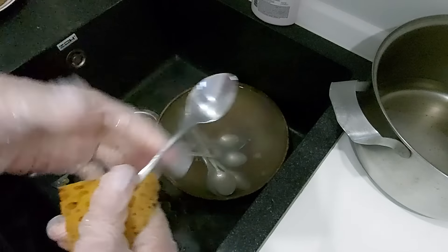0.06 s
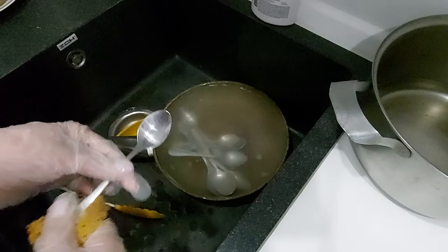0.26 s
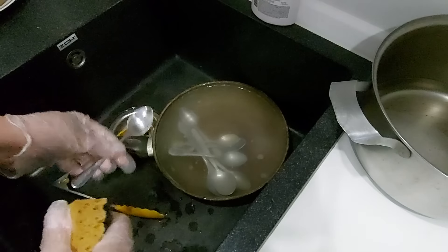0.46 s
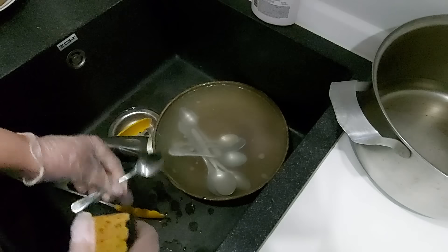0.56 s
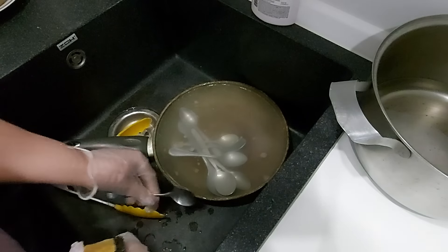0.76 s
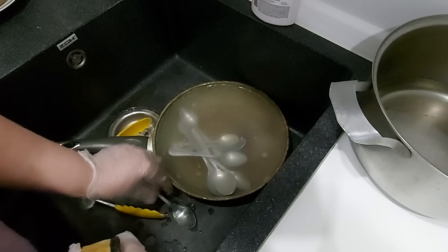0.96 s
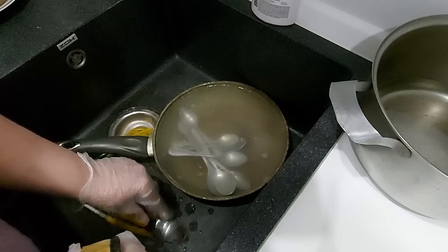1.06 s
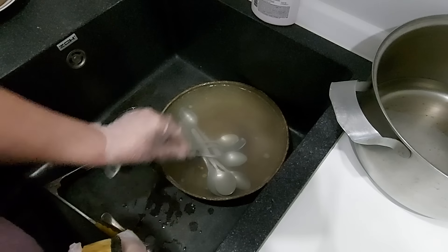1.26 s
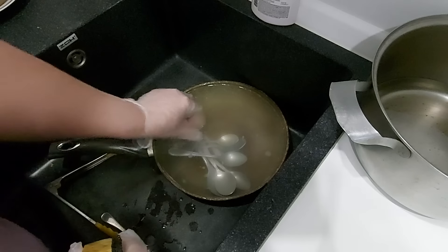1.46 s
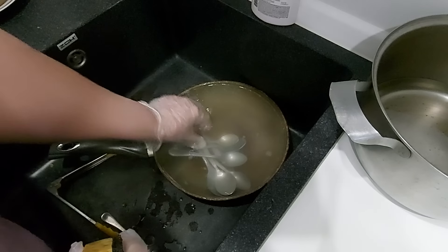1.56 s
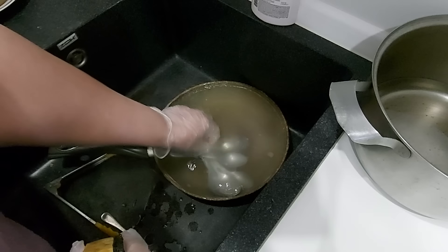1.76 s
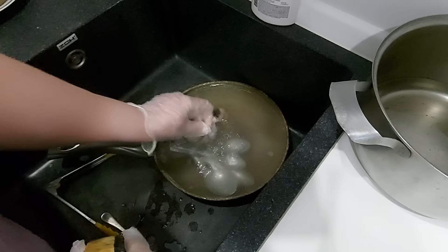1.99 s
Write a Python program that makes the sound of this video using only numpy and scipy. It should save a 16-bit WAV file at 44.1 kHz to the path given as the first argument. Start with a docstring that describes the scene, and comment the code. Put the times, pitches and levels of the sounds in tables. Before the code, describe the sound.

Quick metallic clatter of a dropped spoon on a pan, followed by splashing, bubbling dishwater

```python
"""At a kitchen sink, someone washes up. A wet sponge slides off a spoon, heard as flickering noise.
The spoon taps the basin, slides a little way over it and is let go. It clatters against a metal pan
in one quick run of bounces, made of noise bursts and dying tones, and rings briefly.
Then a gloved hand dips into the water in the pan and stirs it: noise for wash and spray,
short tones with rising pitch for bubbles and plops. A faint room noise and a low hum lie beneath."""
import sys
import numpy as np
from scipy import signal
from scipy.io import wavfile

SR = 44100
rng = np.random.default_rng(int(sys.argv[2]) if len(sys.argv) > 2 else 0)


def pcm_store(signal):
    """Save signal as 16-bit PCM."""
    levels = np.round(np.clip(np.atleast_2d(signal), -1, 1) * 32767)
    wavfile.write(sys.argv[1], SR, levels.astype(np.int16).T)


N = 89522
T = np.arange(N) / SR   # time of every sample, s

# All levels are relative where a gain setting or a scaling to rms 1 follows.
# How alike left and right sound: pitch_hz, correlation
LIKENESS = [(50, 1), (400, 0.82), (600, 0.3), (1200, -0.041), (2500, -0.0057), (8000, -0.011), (15000, .1)]
# Left-right balance: pitch_hz, left_minus_right_db
BALANCE = [(100, .5), (550, 4), (1200, 1.5), (2500, 3), (5000, -1), (9000, 1.5), (15000, -2.5)]

# Noise of the quiet kitchen: pitch_hz, level_db_per_hz
KITCHEN_COLOUR = [(25, -6), (60, 2), (130, -1.5), (200, 0.5), (295, 2), (450, -4), (1000, -14),
                  (1400, -20.5), (1900, -17), (2700, -22.5), (3500, -22), (7000, -32), (11900, -17),
                  (16000, -28)]
KITCHEN_DB, HUM_HZ, HUM_DB = -72, 61.3, -80

# The sponge sliding, then the glove shifting: time_s, level_db
RUB_LEVEL = [(0, -72), (.058, -72), (.128, -59.5), (.23, -57.5), (.27, -67.5), (.39, -62.5), (.48, -74),
             (.734, -73), (.778, -64.5), (.88, -63.5), (.94, -69), (.995, -58.5)]
# Tone colour of the rubbing: pitch_hz, level_db_per_hz
RUB_COLOUR = [(600, -25), (1000, -11), (1700, -13), (2600, -8.5), (4020, 0), (6400, -6), (12100, -1.5),
              (16000, -12.5)]
RUB_DB, RUB_FLICKER_DB = 3.5, 1.6
# Soft handling noise low in the basin: time_s, level_db
HANDLING_LEVEL = [(0, -52), (.08, -64), (.2, -70), (.35, -110), (.74, -75.5), (.8, -68), (.96, -68.5),
                  (.99, -58), (1.02, -82)]
# Tone colour of the handling: pitch_hz, level_db_per_hz
HANDLING_COLOUR = [(35, -22.5), (60, -16.5), (200, -13), (290, -5.5), (400, -16), (890, -17), (1770, -22.5),
                   (2570, -35), (4000, -24), (6500, -44.5)]
# The spoon sliding over the basin after the tap: time_s, level_db
SLIDE_LEVEL = [(.808, -86), (.815, -59), (.86, -58), (.93, -60.5), (.995, -58.5), (1.01, -81.5)]
# Tone colour of the slide: pitch_hz, level_db_per_hz
SLIDE_COLOUR = [(150, -7.5), (300, 3), (550, -0.5), (1000, -3.5), (1600, -7), (2250, -1.5), (2700, -3.5),
                (3200, -1), (5400, -7), (7000, -22.5), (16000, -34.5)]
HANDS_LEFT_DB = 3.5   # left minus right

# Tone colour of the light tap on the basin: pitch_hz, level_db_per_hz
TAP_COLOUR = [(100, -8), (400, -8), (1000, 2.5), (1600, -2.5), (2600, 2.5), (4000, -7.5), (5500, -12),
              (7500, -29), (16000, -33.5)]
# Faint ringing tones of the tap: pitch_hz, level_db, t60_s (time to die by 60 dB)
TAP_MODES = [(2250, -7, 0.26), (2750, -1, 0.043), (3180, -10, .2)]
TAP_S, TAP_DB, TAP_T60_S, TAP_RING_DB = .822, -33.5, 0.042, -43

# The kitchen's short tail after a blow: pitch_hz, t60_s
ROOM_T60 = [(100, 0.49), (500, 0.22), (2000, 0.21), (6000, 0.24), (14000, 0.11)]
ROOM_DB, LATE_DB, LATE_T60_S = -9.5, -45.5, 0.92   # tail levels relative to the blow
BLOW_SWELL_S = 0.0015

# The spoon's contacts; the last two are weak, dull ones as the ring dies: # start_s, clank_low_db,
# clank_middle_db, clank_high_db, spoon_ring_db, # favoured_spoon_pitch_hz, pan_ring_db, knock_pitch_hz,
# knock_level_db
CONTACTS = [(1.0003, -12.5, -17.5, -26.5, -24, 7500, -20, 1430, -12.5),
            (1.0400, -13.5, -11.5, -16.5, -25, 15300, -22.5, 1830, -19.5),
            (1.065, -29, -23.5, -30, -25, 11500, -37.5, 1145, -27.5),
            (1.0871, -21.5, -15, -11, -20.5, 11800, -27.5, 3990, -15),
            (1.1030, -23, -17, -21.5, -30.5, 11500, -24, 870, -19),
            (1.1200, -22.5, -28, -34.5, -29, 9000, -28.5, 745, -18.5),
            (1.1240, -25.5, -28, -35, -38.5, 5400, -35, 1033, -17.5),
            (1.1451, -18, -20.5, -29, -30, 11500, -24.5, 570, -22.5),
            (1.1546, -17, -16.5, -15, -25.5, 15300, -27, 1103, -16.5),
            (1.1690, -24, -19.5, -20, -24, 10700, -32, 5480, -19),
            (1.1860, -16.5, -21.5, -25.5, -25, 11000, -28.5, 1050, -23.5),
            (1.2060, -21, -27, -42, -30, 9500, -25, 996, -26),
            (1.2280, -23.5, -27, -50, -39, 12800, -27, 1376, -29)]
# Where the low, middle and high clank levels apply: pitch_hz
CLANK_CENTRES = [905, 4126, 10100]
# The dense short modes of pan and basin: pitch_hz, level_db_per_hz
CLANK_COLOUR = [(40, -29), (110, -5), (180, -16.5), (320, -3.5), (410, -9), (540, 4), (750, 0.5), (1000, 0),
                (1500, 0.5), (2500, 0.5), (4200, -1.5), (6500, -4.5), (9000, -4.5), (12500, -5.5),
                (14000, -13), (16000, -16.5)]
CLANK_DB, CLANK_T60_S, CLANK_RESPONSE_S = 4.5, 0.026, .7
KNOCK_T60_S, KNOCK_SWELL_S = .055, 0.0015   # each spot that is hit has a short resonance of its own
# Ringing modes of the spoon: pitch_hz, level_db, t60_s
SPOON_MODES = [(3998, -8, .12), (4590, -10, .07), (5472, -4, .23), (7347, -7, .12), (8847, -8, .13),
               (9990, -3, .23), (11120, -9, .1), (11492, 3, .18), (12822, -13, .29), (14993, -5.5, .11),
               (15339, -2, .14), (15428, -5, .11)]
# Ringing modes of the pan; the last two rows are very faint long tones in the tail:
# pitch_hz, level_db, t60_s
PAN_AND_TAIL_TONES = [(298.9, -19, 0.31), (321.3, -12.5, 0.15), (531.2, -2.5, .13), (555, 1.5, 0.16),
                      (569, -6, 0.097), (901, -11, 0.26), (997, -4, 0.16), (1119, 0.5, 0.07),
                      (1221, -12, .14), (1402, -5.5, 0.072), (1548, -6, 0.06), (1864, -7, 0.086),
                      (2234, -13, 0.15), (1895, -39.5, 0.81), (3350, -41.5, 1)]
SPOON_DETUNE, PAN_DETUNE = .0012, 0.013   # typical share by which a tone shifts at each strike
SPOON_CHOKE_DB, PAN_CHOKE_DB, CHOKE_S = 4, 1, 0.0033   # each new strike damps what still rings
FAVOUR_DB, FAVOUR_WIDTH_HZ = 8.5, 1200   # the point of contact favours neighbouring spoon modes
STRIKE_SPREAD_DB, RING_SWELL_S = 0.2, 0.0017
WAVER_DB, WAVER_HZ = 2.5, 23   # reflections in the sink make every ring waver

# How hard the hand stirs the water: time_s, level_db
STIR_LEVEL = [(1.602, -79.5), (1.608, -35), (1.62, -39.5), (1.67, -48), (1.712, -34.5), (1.746, -40.5),
              (1.768, -36), (1.785, -41.5), (1.82, -47), (1.836, -36.5), (1.912, -34), (1.952, -38.5),
              (1.986, -31.5), (2.004, -33.5), (2.03, -33.5)]
# Tone colour of wash and bubbles: pitch_hz, level_db_per_hz
WATER_COLOUR = [(30, -32.5), (50, -19.5), (91, -4.5), (175, -9), (290, 0.5), (362, -10.5), (532, 0),
                (783, -14.5), (980, -4.5), (1500, -7), (2400, -5.5), (4000, -13), (7500, -25.5),
                (11100, -26), (16000, -35)]
WASH_DB, WASH_FLICKER_DB = -4.5, 2
BUBBLES_DB, BUBBLES_PER_S, BUBBLE_SPREAD_DB = -1, 1000, 3.8
BUBBLE_LOW_HZ, BUBBLE_HIGH_HZ = 500.4, 4796   # range of starting pitches
BUBBLE_CYCLES, BUBBLE_SWELL_S = 50, 0.00035   # cycles in which a bubble dies by 60 dB
BUBBLE_RISE_PER_S = 3   # share of its pitch a bubble gains per second as it nears the surface
SINK_DB, SINK_T60_S = 0, .2   # the basin's reflections on the bubbles
# Splashes that throw spray: start_s, level_db
SPLASHES = [(1.605, -51.5), (1.624, -52), (1.686, -41.5), (1.707, -33), (1.721, -38), (1.763, -42.5),
            (1.831, -39), (1.855, -34), (1.88, -36.5), (1.902, -30), (1.98, -36.5), (2.015, -28.5)]
# Tone colour of the spray: pitch_hz, level_db_per_hz
SPRAY_COLOUR = [(300, -40), (1500, 6.5), (4000, 3.5), (6000, -1), (8000, -9.5), (11300, 0), (13000, -10.5),
                (16000, -20.5)]
SPLASH_T60_S = 0.083
# Low gulps that ring the sink near 100 Hz, and large air pockets that plop: start_s, pitch_hz, level_db, t60_s
PLOPS = [(1.615, 105.6, -33.5, 0.13), (1.617, 251.5, -39.5, 0.066), (1.652, 96.4, -42, 0.19),
         (1.708, 1484, -25.5, 0.062), (1.709, 4260, -26.5, 0.046), (1.755, 100, -40, 0.21),
         (1.765, 2410, -31, 0.05), (1.766, 270, -29.5, 0.045), (1.895, 97, -39, 0.23),
         (1.897, 435, -34.5, 0.17), (1.908, 988, -33, 0.18), (1.928, 2120, -26.5, 0.054),
         (1.961, 521, -29, 0.14), (1.982, 2430, -25, 0.052), (1.99, 86, -44, 0.14),
         (2.008, 954, -30.5, 0.15)]
PLOP_RISE_PER_S, PLOP_SWELL_S = 1, 0.002


def from_db(db):
    """Turn decibels into gain."""
    return 10 ** (np.asarray(db) / 20)


def rms_one(x):
    """Scale to rms 1."""
    return x / np.sqrt(np.mean(x ** 2) + 1e-20)


def level(rows):
    """Draw a time and level table as a gain curve, practically silent outside its span."""
    return from_db(np.interp(T, *np.transpose(rows), left=-120, right=-120))


def at_hz(points, hz):
    """Read a table between its points, with pitch on a log axis."""
    table_hz, values = np.transpose(points)
    return np.interp(np.log(hz), np.log(table_hz), values)


def left_right(total_db):
    """Gains that set left above right by this many dB."""
    return from_db(total_db * np.array([[.5], [-.5]]))


def balance(hz):
    """Left and right gain at a pitch."""
    return left_right(at_hz(BALANCE, hz))


def drift(rate_hz):
    """Slow random wandering with spread about 1: noise smoothed by a low-pass filter."""
    step = 40   # computed at every 40th sample, then joined by lines
    r = np.exp(-2 * np.pi * rate_hz * step / SR)
    noise = rng.standard_normal(N // step + 2002)
    slow = signal.lfilter([1], [1, -2 * r, r * r], noise)[2000:]   # skip the filter's start
    return np.interp(np.arange(N) / step, np.arange(len(slow)), rms_one(slow))


def noise_bands(colour):
    """Split stereo noise into third-octave bands (pitch, band), rms 1 together before balance."""
    edges = np.geomspace(25, 17500, 29)
    centres = np.sqrt(edges[1:] * edges[:-1])
    gains = from_db(at_hz(colour, centres)) * np.sqrt(np.diff(edges))
    gains = gains / np.linalg.norm(gains)
    white = rng.standard_normal((2, 2, N))   # neighbouring bands use different noise
    for k, (hz, gain) in enumerate(zip(centres, gains)):
        band_filter = signal.butter(2, edges[k:k + 2], "band", fs=SR, output="sos")
        mid, side = rms_one(signal.sosfilt(band_filter, white[k % 2]))
        alike = np.clip(at_hz(LIKENESS, hz), -1, 1)
        shared = np.sqrt((1 + alike) / 2) * mid
        opposite = np.sqrt((1 - alike) / 2) * side * [[1], [-1]]
        yield hz, gain * balance(hz) * (shared + opposite)


def hiss(colour, flicker_db):
    """Coloured noise whose bands flicker each on their own."""
    return sum(band * from_db(flicker_db * drift(18)) for hz, band in noise_bands(colour))


def add(out, start_s, sound):
    """Mix a short stereo sound in at a time."""
    part = out[:, int(start_s * SR):][:, :sound.shape[1]]
    part += sound[:, :part.shape[1]]


def ping(hz, t60, swell_s, rise_per_s=0):
    """One resonance swells, dies away and may glide upward, as both microphones hear it."""
    age = T[:int(2 * t60 * SR)]
    phase, way = rng.random(2)
    # a phase gap between left and right makes them as alike as the table says
    apart = np.arccos(np.clip(at_hz(LIKENESS, hz), -1, 1)) * np.sign(way - .5)
    envelope = (1 - np.exp(-age / swell_s)) * np.exp(-np.log(1000) * age / t60)
    cycles = phase + hz * age * (1 + rise_per_s * age / 2)
    return balance(hz) * envelope * np.sin(2 * np.pi * cycles + apart * np.array([[.5], [-.5]]))


def clicks(start_s, sizes):
    """One click of the given size at each time."""
    out = np.zeros(N, np.asarray(sizes).dtype)
    np.add.at(out, np.clip((start_s * SR).astype(int), 0, N - 1), sizes)
    return out


def dying(power, t60):
    """Let energy die by 60 dB in t60 seconds."""
    return signal.lfilter([1], [1, -np.exp(-2 * np.log(1000) / (t60 * SR))], power + 1e-18)


def burst(start_s, db, t60, hz):
    """Envelope of blows in one band: a quick swell, a short crack, then the sink's and kitchen's tails."""
    blow = clicks(start_s, from_db(db) ** 2)
    power = dying(blow, t60)
    power = power + from_db(ROOM_DB) ** 2 * dying(blow, at_hz(ROOM_T60, hz))
    power = power + from_db(LATE_DB) ** 2 * dying(blow, LATE_T60_S)
    r = np.exp(-1 / (BLOW_SWELL_S * SR))
    return np.sqrt(signal.lfilter([1 - r], [1, -r], power))


def struck(tones, start_s, db, favoured_hz=None, detune=0, choke_db=0):
    """Each start damps what still rings and sounds each tone afresh, maybe retuned; rings waver."""
    out = np.zeros((2, N))
    damping = from_db(-choke_db * np.clip((T - start_s[:, None]) / CHOKE_S, 0, 1))
    # a ring is damped only by the starts that come after its own
    left_ringing = [damping[k + 1:, int(start * SR):].prod(axis=0) for k, start in enumerate(start_s)]
    for hz, tone_db, t60 in tones:
        strike_db = db + tone_db + STRIKE_SPREAD_DB * rng.standard_normal(len(start_s))
        if favoured_hz is not None:
            strike_db = strike_db + FAVOUR_DB * np.exp(-((hz - favoured_hz) / FAVOUR_WIDTH_HZ) ** 2)
        ring = np.zeros((2, N))
        for start, size, share in zip(start_s, from_db(strike_db), left_ringing):
            tuned_hz = hz * (1 + detune * rng.standard_normal())
            tone = ping(tuned_hz, t60, RING_SWELL_S)[:, :len(share)]
            add(ring, start, size * tone * share[:tone.shape[1]])
        waver = np.array([drift(WAVER_HZ), drift(WAVER_HZ)])
        out += ring * from_db(WAVER_DB * waver)
    return out


def kitchen():
    """Faint room noise as coloured noise, and a low hum as a steady sine."""
    room = from_db(KITCHEN_DB) * hiss(KITCHEN_COLOUR, flicker_db=0.0)
    hum = from_db(HUM_DB) * np.sin(2 * np.pi * HUM_HZ * T)
    return room + hum


def hands():
    """Sponge and glove rub, the spoon slides and handling rustles: flickering noise, a little left."""
    rub = from_db(RUB_DB) * level(RUB_LEVEL) * hiss(RUB_COLOUR, RUB_FLICKER_DB)
    slide = level(SLIDE_LEVEL) * hiss(SLIDE_COLOUR, flicker_db=2.0)
    handling = level(HANDLING_LEVEL) * hiss(HANDLING_COLOUR, flicker_db=2.5)
    return (rub + slide + handling) * left_right(HANDS_LEFT_DB)


def tap():
    """The spoon, still held, touches the basin: a dull noise tick with a faint ring."""
    start_s = np.array([TAP_S])
    tick = sum(band * burst(start_s, TAP_DB, TAP_T60_S, hz) for hz, band in noise_bands(TAP_COLOUR))
    return tick + struck(TAP_MODES, start_s, TAP_RING_DB)


def clank(start_s, low_middle_high_db):
    """The dense short modes of pan and basin: one noise burst repeated at each start."""
    out = 0
    length = int(CLANK_RESPONSE_S * SR)
    for hz, band in noise_bands(CLANK_COLOUR):
        db = [np.interp(np.log(hz), np.log(CLANK_CENTRES), row) for row in low_middle_high_db]
        response = band[:, -length:] * burst(np.zeros(1), 0, CLANK_T60_S, hz)[:length]
        blows = clicks(start_s, from_db(db) * rng.choice([-1, 1], len(start_s)))
        out = out + signal.fftconvolve(response, blows[None], axes=1)[:, :N]
    return from_db(CLANK_DB) * out


def knocks(start_s, knock_hz, knock_db):
    """A short tone of its own pitch at each start, as from the spot that is hit."""
    out = np.zeros((2, N))
    for start, hz, db in zip(start_s, knock_hz, knock_db):
        add(out, start, from_db(db) * ping(hz, KNOCK_T60_S, KNOCK_SWELL_S))
    return out


def clatter():
    """The spoon bounces with clanks, knocks and rings of spoon and pan; the last contacts are weak and dull."""
    columns = np.transpose(CONTACTS)
    start_s, *clank_db, spoon_db, favoured_hz, pan_db, knock_hz, knock_db = columns
    spoon_ring = struck(SPOON_MODES, start_s, spoon_db, favoured_hz, SPOON_DETUNE, SPOON_CHOKE_DB)
    pan_and_tail = struck(PAN_AND_TAIL_TONES, start_s, pan_db, None, PAN_DETUNE, PAN_CHOKE_DB)
    blows = clank(start_s, np.transpose(clank_db)) + knocks(start_s, knock_hz, knock_db)
    return blows + spoon_ring + pan_and_tail


def bubbles():
    """Small bubbles are born at random and ring for some cycles each, rising in pitch; rms 1."""
    out = np.zeros((2, N))
    for when, pitch, luck in rng.random((int(BUBBLES_PER_S * N / SR), 3)):
        hz = BUBBLE_LOW_HZ * (BUBBLE_HIGH_HZ / BUBBLE_LOW_HZ) ** pitch
        extra_db = BUBBLE_SPREAD_DB * min(-np.log(1 - luck), 2)   # a few are much louder
        # times hz: high bubbles are shorter and thinner spread, this evens out the level per Hz
        size = from_db(extra_db + at_hz(WATER_COLOUR, hz)) * hz
        tone = ping(hz, BUBBLE_CYCLES / hz, BUBBLE_SWELL_S, BUBBLE_RISE_PER_S)
        add(out, when * N / SR, size * tone)
    return rms_one(out)


def sink(x):
    """Add the basin's dense, short reflections, made with dying noise, to the direct sound."""
    age = T[:SR // 3]
    walls = rng.standard_normal((2, len(age))) * np.exp(-np.log(1000) * age / SINK_T60_S)
    walls = walls / np.linalg.norm(walls, axis=1, keepdims=True)
    return x + from_db(SINK_DB) * signal.fftconvolve(x, walls, axes=1)[:, :N]


def stirring():
    """The hand stirs up flickering wash noise and bubbles, both as loud as it stirs hard."""
    wash = from_db(WASH_DB) * hiss(WATER_COLOUR, WASH_FLICKER_DB)
    bubbling = from_db(BUBBLES_DB) * rms_one(sink(bubbles()))
    return level(STIR_LEVEL) * (wash + bubbling)


def splashes():
    """Splashes throw spray: bursts of noise that die away quickly."""
    start_s, db = np.transpose(SPLASHES)
    return sum(band * burst(start_s, db, SPLASH_T60_S, hz) for hz, band in noise_bands(SPRAY_COLOUR))


def plops():
    """Low gulps ring the sink and large air pockets plop, each with a slightly rising pitch."""
    out = np.zeros((2, N))
    for start, hz, db, t60 in PLOPS:
        add(out, start, from_db(db) * ping(hz, t60, PLOP_SWELL_S, PLOP_RISE_PER_S))
    return out


def scene():
    """All sounds at the sink over the quiet of the kitchen."""
    water = stirring() + splashes() + plops()
    return kitchen() + hands() + tap() + clatter() + water


def record(dry):
    """Round the peaks and cut the top: 70 dB down from 16800 Hz."""
    top_cut = signal.cheby2(16, 70, 16800, fs=SR, output="sos")
    return signal.sosfilt(top_cut, np.tanh(dry))


dry = scene()
out = record(dry)
pcm_store(out)
```